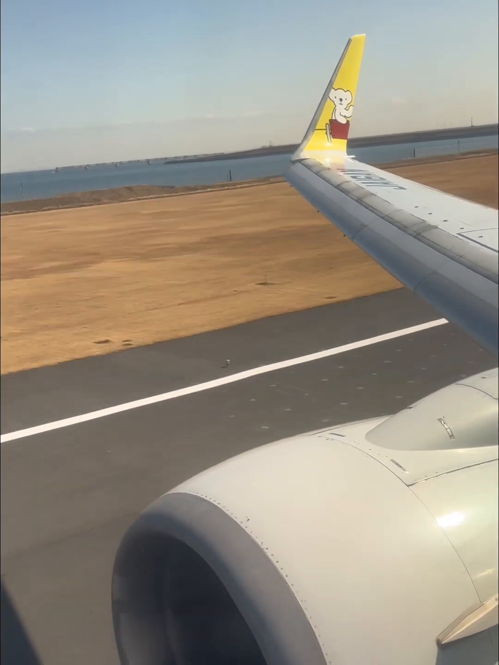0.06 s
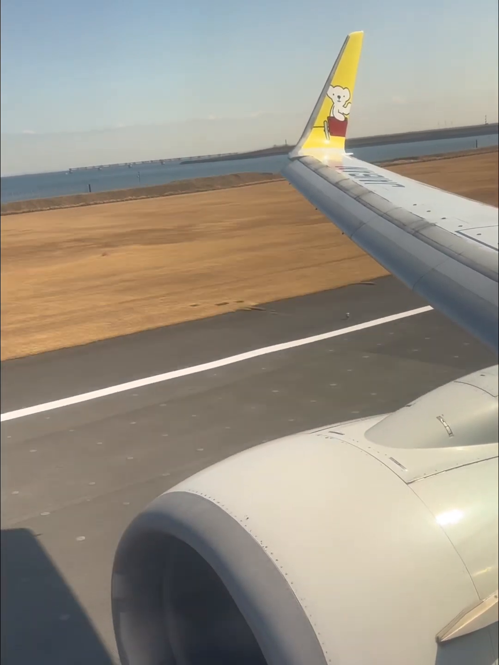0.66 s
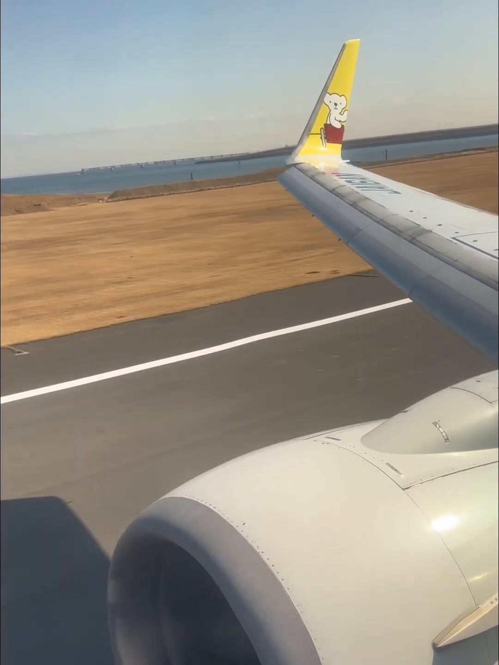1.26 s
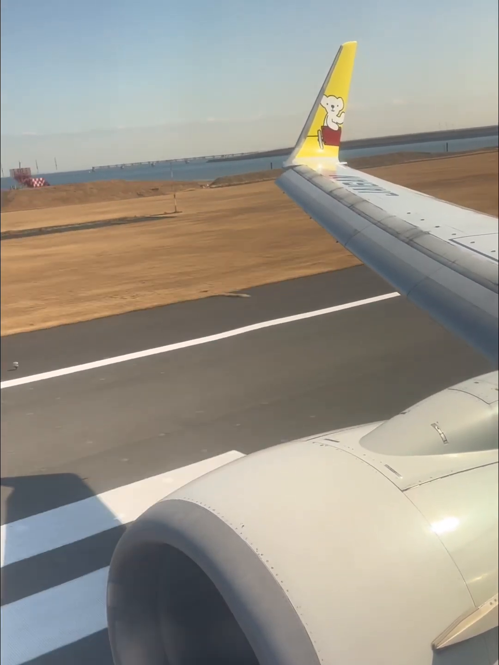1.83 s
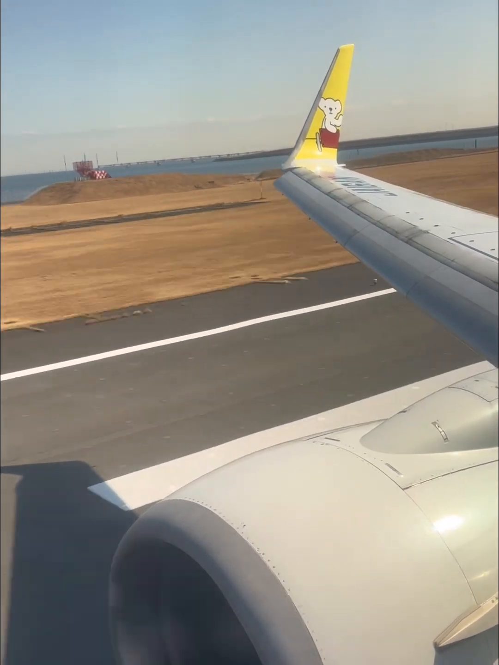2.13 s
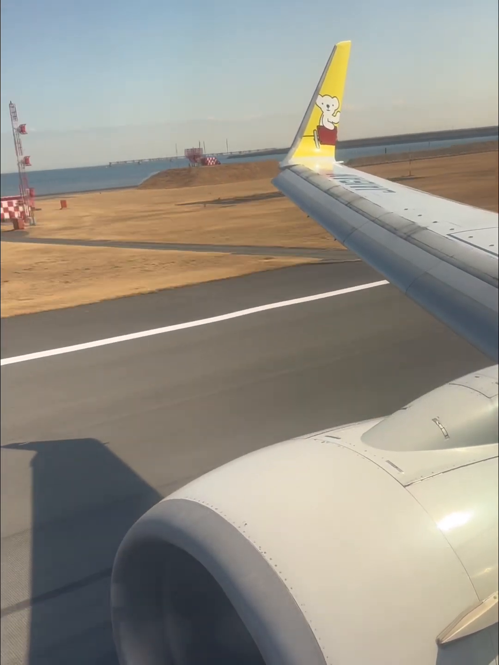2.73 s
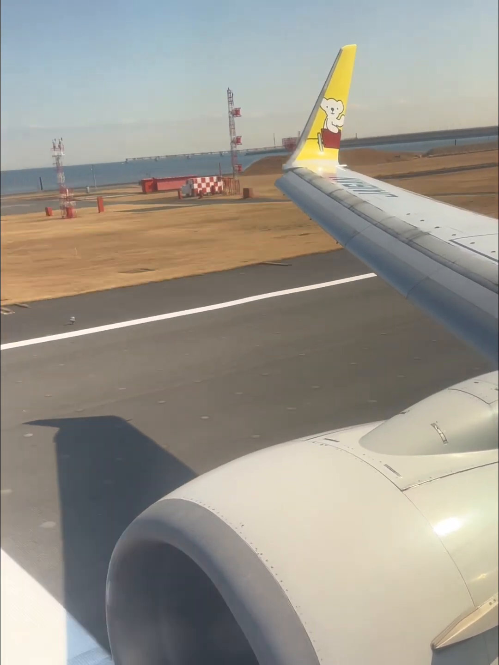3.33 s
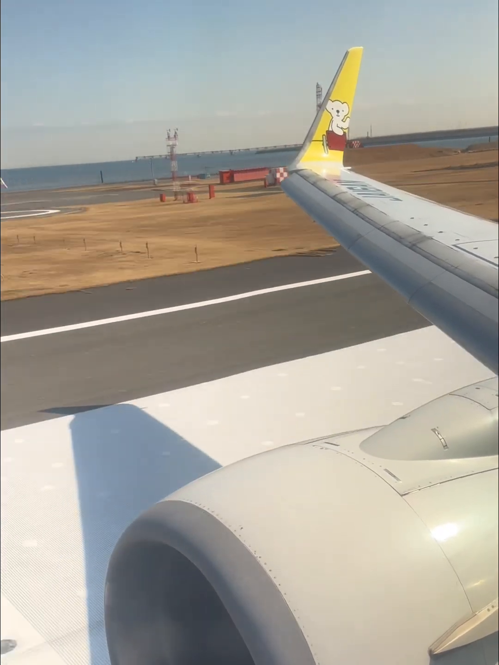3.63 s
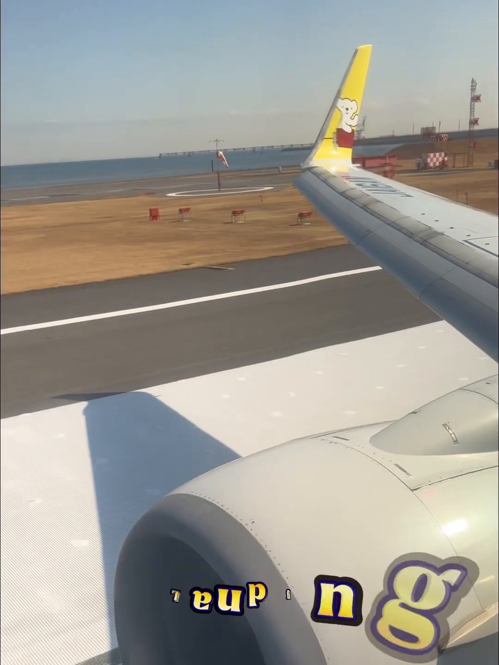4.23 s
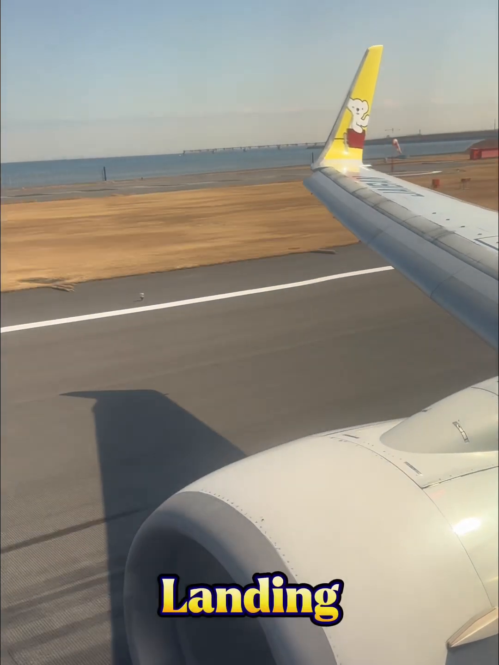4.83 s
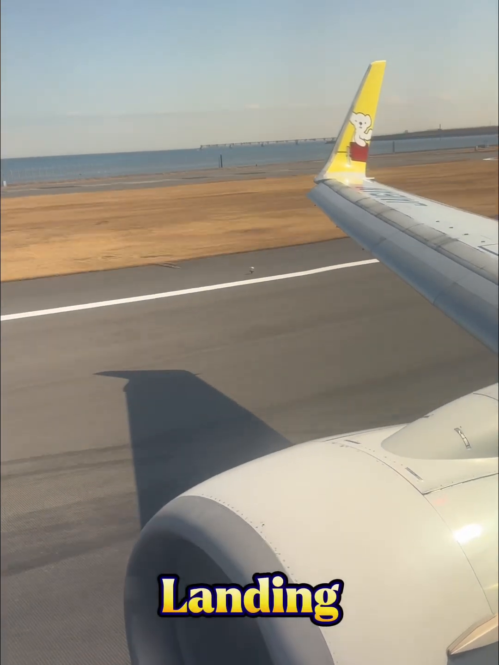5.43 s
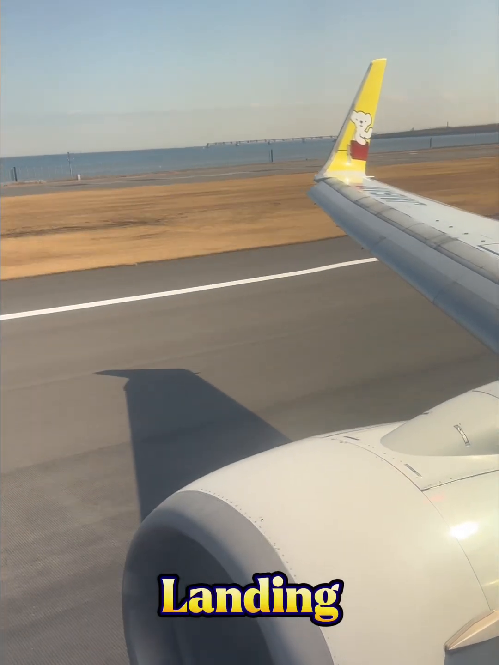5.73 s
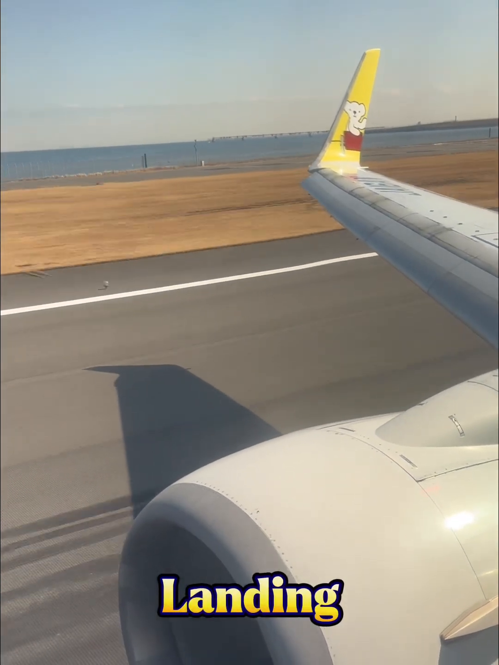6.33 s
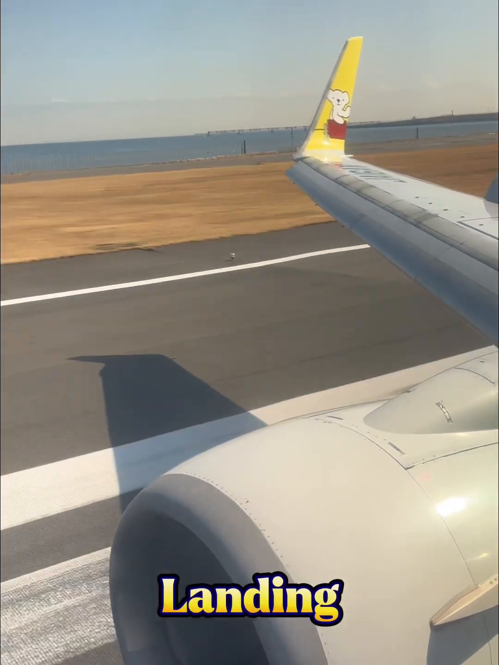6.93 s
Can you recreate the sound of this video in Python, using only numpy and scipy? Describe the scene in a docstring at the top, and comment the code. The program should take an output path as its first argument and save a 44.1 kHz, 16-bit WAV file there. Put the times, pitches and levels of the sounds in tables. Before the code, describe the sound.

Rushing air and engine hum inside an airliner, then wheels thump down, the cabin rattles, and a reverse thrust roar builds.

```python
"""Landing from a window seat

Air rushes along an airliner's hull and hisses from the vents; the engine beside the seat hums while its
fan whine glides down to idle. The wheels thump onto the runway, the tyres rumble, and the cabin trim
rattles and clicks with the jolts. The reversers whirr open and their roar builds as the plane slows."""
import sys
import numpy as np
from scipy import signal
from scipy.fft import rfft, irfft, next_fast_len
from scipy.io import wavfile
from scipy.ndimage import uniform_filter1d, minimum_filter1d, map_coordinates

SR = 44100
rng = np.random.default_rng(int(sys.argv[2]) if len(sys.argv) > 2 else 0)


def materialize(psi):
    """Save the field psi as 16-bit PCM at rate SR to the path in sys.argv[1].

    A 1-D psi becomes a single channel; in a 2-D psi each row is a channel.
    """
    bounded = np.clip(np.atleast_2d(psi).T, -1, 1)
    quanta = np.round(bounded * 32767).astype(np.int16)
    wavfile.write(sys.argv[1], SR, quanta)


N = 316197
THROTTLE_CLOSE_S, TOUCHDOWN_S, REVERSE_S = .46, 3.86, 5.97


def amp(db):
    """Decibels to gain."""
    return 10 ** (np.asarray(db) / 20)


def unit(x):
    """Scale to rms 1."""
    return x / np.sqrt(np.mean(x ** 2) + 1e-20)


def since(s):
    """Seconds since a moment, zero before it."""
    return np.maximum(np.arange(N) / SR - s, 0)


def fader(points):
    """A gain for every sample, riding through (seconds, dB) points."""
    return amp(np.interp(since(0), *np.transpose(points)))


def wobble(rate):
    """A smooth random curve, rate knots a second."""
    knots = rng.standard_normal(int(N * rate / SR) + 4)
    return map_coordinates(knots, [np.arange(N) * rate / SR])


def along(points, hz):
    """Read (Hz, value) points on a log frequency axis."""
    f, values = np.transpose(points)
    return np.interp(np.log(hz + 1), np.log(f + 1), values)


def colour(spectrum):
    """An EQ curve through (Hz, dB) points."""
    return lambda hz: amp(along(spectrum, hz))


def filtered(x, response):
    """Shape x with a response given as a function of frequency."""
    size = next_fast_len(N + SR // 2)
    return irfft(rfft(x, size) * response(np.fft.rfftfreq(size, 1 / SR)), size)[..., :N]


def resonance(f, hz, width):
    """Response of one damped mode."""
    return 1j * f * width / (hz * hz - f * f + 1j * f * width)


def peaks(modes):
    """An EQ curve of resonant peaks, each (centre Hz, width Hz, dB)."""
    return lambda f: sum(amp(db) * np.abs(resonance(f, hz, width)) ** 2 for hz, width, db in modes)


def cabin(pair):
    """Spread two unrelated signals: long waves reach both ears alike, short ones differ."""
    # The stereo image at the seat. Each row: frequency in Hz, left-right likeness (1 is identical),
    # left minus right in dB, left's phase lead in radians.
    image = [(85, 1, 0, 0), (130, .998, 0, .02), (200, .994, 0, .05), (360, .97, -.4, .15),
             (480, .8, -1, .35), (750, .62, 0, .3), (1000, .72, -1.5, .45), (1220, .5, -4.5, .35),
             (1550, .82, -1, .2), (1900, .65, -1, .2), (2150, .88, .3, .3), (2450, .4, -.5, .7),
             (3200, .35, -.7, .7), (3800, .38, -.5, 1.2), (4800, .5, .3, 2.1), (5600, .5, 0, .7),
             (6500, .75, 0, -.1), (8500, .62, 0, -1.2), (11000, .65, 0, -2.6)]
    likeness, tilt_db, lead = (np.array(image)[:, [0, column]] for column in (1, 2, 3))
    turn = lambda hz: np.arccos(np.clip(along(likeness, hz), -1, 1)) / 2
    mid, side = filtered(pair, lambda hz: np.array([np.cos(turn(hz)), np.sin(turn(hz))]))
    lean = lambda hz: amp(along(tilt_db, hz) / 2) * np.exp(1j * along(lead, hz) / 2)
    return filtered(np.array([mid + side, mid - side]), lambda hz: np.array([lean(hz), 1 / lean(hz)]))


def rush(response):
    """Turbulence coloured by a response, filling the cabin at rms 1."""
    return unit(filtered(cabin(rng.standard_normal((2, N))), response))


def ripple(x, depth_db=2.4, spacing_hz=55, lowest_hz=2400):
    """Reflections off wall and seats carve still peaks and dips into the treble."""
    knots = rng.standard_normal(int(SR / 2 / spacing_hz) + 4)
    swing_db = lambda hz: depth_db * map_coordinates(knots, [hz / spacing_hz])
    return filtered(x, lambda hz: amp(swing_db(hz) * (hz > lowest_hz)))


def spool(before, after, start_s, lag_s):
    """A heavy rotor eases from one state to another."""
    lags = since(start_s) / lag_s
    return after + (before - after) * (1 + lags) * np.exp(-lags)


def slipstream(flutter_db=.61):
    """The hull passes the low part of the air rushing by, easing as the plane slows."""
    # The rush through the hull. Each row: frequency in Hz, relative level in dB.
    hull_eq = [(5, -73), (18, -38.5), (32, -11.5), (52, 0), (97, 0.5), (122, -1), (162, -5.5), (195, -4.5),
               (240, -4), (272, -10.5), (305, -7.5), (348, -10), (385, -22.5), (540, -30), (1500, -92.5)]
    # Its fader ride. Each row: time in seconds, level in dB.
    ride = [(0, -12), (.7, -14.5), (1.2, -15.5), (2.1, -14.6), (2.8, -16.5), (3.3, -15), (3.8, -15),
            (5.3, -16), (7.17, -18.5)]
    return fader(ride) * amp(flutter_db * wobble(7)) * rush(colour(hull_eq))


def vents(hiss_db=-40.5, hiss_db_per_s=-.34, duct_db=-45.5, duct_db_per_s=-.2, edge_hz=10500):
    """The air conditioning hisses, rings and whistles in its ducts, slowly easing off."""
    # The broad hiss of air. Each row: frequency in Hz, relative level in dB.
    hiss_eq = [(200, -4), (480, -1), (790, 0.5), (890, -6), (1020, -4), (1160, -10), (1600, -12.5),
               (1720, -15), (1930, -18), (2300, -20), (2700, -17), (4200, -22), (5000, -19.5), (6200, -26),
               (9500, -30)]
    # Resonances of the vents and ducts. Each row: centre in Hz, width in Hz, relative level in dB.
    duct_modes = [(606, 40, 10), (781, 68, 6.5), (1427, 120, -4.5), (1613, 33, -2), (3390, 100, -17),
                  (5000, 70, -12.5), (5610, 210, -17)]
    # The breathy whistle. Each row: centre in Hz, width in Hz, relative level in dB.
    whistle_modes = [(2033, 82, -5), (2136, 57, 0.5), (2276, 300, -9.5)]
    # The whistle's fader ride. Each row: time in seconds, level in dB.
    whistle_ride = [(0, -52), (.5, -51.5), (1, -51.5), (1.5, -55.5), (1.9, -55), (2.6, -52.5), (3.4, -52.5),
                    (5, -53.5), (7.17, -56)]
    t = since(0)
    rolled_off = lambda hz: colour(hiss_eq)(hz) / np.sqrt(1 + (hz / edge_hz) ** 20)
    hiss = amp(hiss_db + hiss_db_per_s * t) * rush(rolled_off)
    ducts = amp(duct_db + duct_db_per_s * t) * rush(peaks(duct_modes))
    whistle = fader(whistle_ride) * rush(peaks(whistle_modes))
    return ripple(hiss) + ducts + whistle


def fan_whine(start_hz=41.3, idle_hz=23.95, buzz_db=-48, buzz_above_hz=38.8, rush_db=-59):
    """Blade tones glide down with the shaft; the supersonic tips' buzz and the fan's rush die away."""
    # Blade tones, loudest as they beam at the seat. Each row: multiple of the shaft speed, level in dB
    # before the wall, shaft speed in Hz that aims the beam at the seat, beam spread in shaft Hz.
    blades = [(116, -68, 39, 2), (122, -64, 41, 1.6), (124, -62, 41, .5), (134, -68, 41, 2),
              (140, -64, 31, 2), (146, -62.5, 38.5, 2), (148, -60, 40.2, .7), (148, -65.5, 34, 4),
              (156, -62, 38.3, .6), (156, -62, 27.9, .4), (156, -59.5, 26.35, .5), (164, -67, 34, 3.5),
              (172, -65.5, 40.6, 1), (172, -59.5, 33.9, 2.8), (172, -61, 28.6, .5), (180, -65, 41.3, .6),
              (196, -59.5, 39.6, 1.6)]
    # Resonances where the wall lets the whine in. Each row: centre in Hz, width in Hz, gain in dB.
    wall_modes = [(4100, 110, -2), (4600, 110, 1), (4830, 120, -1), (5100, 100, -1), (5460, 110, 2),
                  (5690, 90, -6), (6020, 200, -1), (6250, 150, -7), (7080, 250, -2), (7500, 400, -6)]
    shaft_hz = spool(start_hz, idle_hz, THROTTLE_CLOSE_S, lag_s=.92)
    drift, flicker = wobble(110), np.array([wobble(24), wobble(24)])
    shifted = lambda curve: np.roll(curve, rng.integers(N), axis=-1)  # each tone wavers in its own way

    def tone(multiple, jitter_hz=.1, blur_radians=.45, flicker_db=3):
        """One multiple of the shaft speed, blurred by uneven inflow."""
        turns = np.cumsum(shaft_hz + jitter_hz * shifted(drift)) / SR
        phase = 2 * np.pi * multiple * turns + blur_radians * shifted(flicker)
        return amp(flicker_db * shifted(flicker)) * np.sqrt(2) * np.sin(phase)

    supersonic = np.clip((shaft_hz - buzz_above_hz) / (start_hz - buzz_above_hz), 0, 1)
    out = amp(buzz_db) * np.sqrt(supersonic) * tone(multiple=24)
    grid_hz = np.arange(SR // 2)
    wall = peaks(wall_modes)(grid_hz)
    for multiple, db, aim_hz, spread_hz in blades:
        beam = np.exp(-.5 * ((shaft_hz - aim_hz) / spread_hz) ** 2)
        through_wall = np.interp(multiple * shaft_hz, grid_hz, wall)
        out += amp(db) * beam * through_wall * tone(multiple)
    air = rush(lambda f: resonance(f, hz=6500, width=4500) ** 2)
    return out + amp(rush_db) * (shaft_hz / start_hz) ** 6 * air


def core_hum(start_hz=203, idle_hz=177.5, waver_db=2, waver_hz=.96, blur_radians=.35):
    """The core shaft's imbalance hums through the wing, once a turn, blurred by the buffeting."""
    # The hum's fader ride. Each row: time in seconds, level in dB.
    ride = [(0, -28.5), (1.5, -27.5), (1.85, -21), (2.35, -19), (2.7, -31), (3.15, -19), (3.6, -29),
            (4.8, -27.5), (5.5, -20.5), (6.2, -22), (6.7, -27), (6.92, -16), (7.17, -31)]
    shaft_hz = spool(start_hz, idle_hz, THROTTLE_CLOSE_S, lag_s=.88) + waver_hz * wobble(14)
    phase = 2 * np.pi * np.cumsum(shaft_hz) / SR + blur_radians * wobble(36)
    return fader(ride) * amp(waver_db * wobble(16)) * np.sqrt(2) * np.sin(phase)


def rolling(db, db_per_s, settle_s=.052):
    """A gain that opens as the wheels take the weight, then drifts steadily in dB."""
    age = since(TOUCHDOWN_S)
    return np.minimum(age / settle_s, 1) * amp(db + db_per_s * age)


def shaking(attack_s=.05, fall_db_per_s=93.5):
    """The cabin's shake: each jolt rises, holds and dies away; their energies add."""
    # Jolts from the runway. Each row: end of the rise in seconds, strength in dB, hold in seconds.
    jolts = [(3.896, -38, .07), (4.034, -34, 0.3), (4.363, -45, 0.065), (4.472, -45, .075),
             (5.039, -39, .075), (5.254, -44, 0.12), (5.523, -44.5, 0.04), (5.664, -45.5, 0.031),
             (5.904, -47.5, 0.036), (6.12, -51, .04), (6.748, -52.5, 0.089), (6.9, -52.5, 0.25)]
    energy = np.zeros(N)
    for s, db, hold_s in jolts:
        rise = np.minimum(since(s - attack_s) / attack_s, 1)
        energy += (rise * amp(db - fall_db_per_s * since(s + hold_s))) ** 2
    return np.sqrt(energy)


def tyre_rumble(jolt_gain_db=29, bump_db=1.35):
    """Tyres rumble over uneven pavement, harder in each jolt and as the brakes bite."""
    # The rumble's tone. Each row: frequency in Hz, relative level in dB.
    tyre_eq = [(8, -55), (20, -17), (32, -11), (52, 3.5), (72, 1.5), (90, -7), (115, -11), (170, -18.5),
               (260, -28.5), (400, -34), (900, -41.5), (1600, -60), (5000, -110)]
    level = np.hypot(rolling(db=-16.5, db_per_s=1.47), amp(jolt_gain_db) * shaking())
    return level * amp(bump_db * wobble(15)) * rush(colour(tyre_eq))


def rattle(contacts_per_s=900, t60=.014, rub=.68, trim_gain_db=-1.5, panel_gain_db=-7.5,
           clump_db=3.5, panel_lag_s=.038):
    """Shaken trim chatters in many tiny contacts; the heavier panels buzz late and linger."""
    # The chattering trim. Each row: frequency in Hz, relative level in dB.
    trim_eq = [(150, -53), (500, -1.5), (800, 9), (1050, 5.5), (1300, 1.5), (1750, -1.5), (2300, -2.5),
               (3100, -5.5), (4200, -10), (5000, -9.5), (6000, -8), (8000, -11), (10500, -12),
               (12000, -35.5), (16000, -35.5)]
    # Modes of the plastic panels and bins. Each row: centre in Hz, width in Hz, relative level in dB.
    panel_modes = [(2225, 210, 1.5), (2960, 170, -6), (3510, 170, -0.5), (3935, 100, 0), (4230, 200, 0),
                   (4900, 300, -5)]
    shake = np.hypot(shaking(), rolling(db=-54, db_per_s=-.6))  # rolling alone keeps them just astir
    inertia = np.exp(-1 / (panel_lag_s * SR))
    panel_shake = signal.lfilter([1 - inertia], [1, -inertia], shake)
    contacts = (rng.random(N) < contacts_per_s / SR) * rng.random(N)
    decay = amp(-60 * np.arange(SR // 8) / SR / t60)
    energy = np.abs(signal.fftconvolve(contacts ** 2, decay ** 2)[:N])
    chatter = lambda: (unit(np.sqrt(energy)) + rub) * rng.standard_normal((2, N))
    trim = filtered(chatter(), colour(trim_eq))
    panels = np.zeros((2, N))
    for hz, width, db in panel_modes:
        clumps = chatter() * amp(clump_db * wobble(90))
        panels += amp(db) * filtered(clumps, lambda f: resonance(f, hz, width))
    buzz = amp(panel_gain_db) * panel_shake * unit(cabin(panels))
    return amp(trim_gain_db) * shake * unit(cabin(trim)) + buzz


def gear_thumps(judder_radians=.93):
    """Hard blows through the landing gear set the airframe booming for a few uneven cycles."""
    # The blows. Each row: start in seconds, peak level in dB, pitch in Hz, swell time in seconds.
    blows = [(3.872, -1.5, 52.8, .02), (3.955, -9.5, 183.3, 0.053), (3.965, -7.5, 58, .025),
             (4.02, -5.5, 59.7, 0.017), (4.06, -7, 165.3, 0.054), (4.14, -6, 122.6, 0.045),
             (4.195, -6, 72, 0.04), (4.268, -1.5, 74.8, .026), (4.335, -6, 53.1, .032),
             (4.49, -9, 119.6, 0.018), (4.507, -3.5, 65.6, 0.014), (4.776, -7, 107.8, .014),
             (4.87, -9, 56.6, 0.021), (5.015, -8.5, 139.6, .035), (5.1, -11.5, 54.8, 0.028),
             (5.29, -9, 100, 0.024), (5.405, -13.5, 221, 0.028), (5.869, -2, 54.8, 0.018),
             (6.355, -7.5, 60.1, .044), (6.37, -9, 104.5, 0.014), (6.52, -7.5, 49.5, 0.045),
             (6.89, -11, 56.4, .04), (7.091, -9.5, 62.7, .02)]
    out = np.zeros(N)
    for s, db, hz, swell_s in blows:
        age = since(s)
        envelope = (age / swell_s * np.exp(1 - age / swell_s)) ** 2
        phase = 2 * np.pi * hz * age + judder_radians * wobble(hz / 2)
        out -= amp(db) * envelope * np.sin(phase)
    return out


def clicks(ring_q=4, crack_q=1.2, crack_db=-5, crack_t60=.0051, room_db=-24, room_t60=.16,
           edge_hz=12000):
    """Loose plastic fittings snap home: a broad crack, a short ring, a brief answer from the cabin."""
    # The fittings' knocks. Each row: start in seconds, strength in dB, centre in Hz,
    # seconds for the ring to fall 60 dB.
    knocks = [(3.913, -27, 5970, .0063), (3.933, -20, 8500, 0.0071), (3.948, -20.5, 7280, 0.0065),
              (3.953, -31, 8000, .03), (3.974, -21, 5800, .01), (3.973, -14.5, 1200, .035),
              (4.034, -24, 8000, .025), (4.058, -17.5, 1000, 0.04), (4.095, -28, 3800, .03),
              (4.097, -16, 1100, .04), (4.148, -14.5, 950, 0.047), (4.17, -16.5, 1200, 0.046),
              (4.198, -24.5, 4100, .03), (4.217, -24, 4200, .05), (4.278, -18.5, 850, .05),
              (4.324, -15, 960, 0.044), (4.326, -21.5, 2230, .04), (4.344, -21.5, 7420, .012),
              (4.398, -18.5, 900, .05), (4.645, -19.5, 1096, 0.052), (4.811, -28, 2020, .022),
              (4.831, -22.5, 1200, .06), (4.848, -19.5, 1140, 0.076), (5.144, -28.5, 7000, 0.034),
              (5.151, -16.5, 7260, .026), (5.151, -24.5, 2800, .027), (5.154, -14.5, 995, .085),
              (5.241, -27, 7000, 0.019), (5.327, -32.5, 3800, .05), (5.369, -25, 6160, 0.01),
              (5.37, -26, 2200, .02), (5.573, -28.5, 7240, .009), (5.658, -27, 6500, .016),
              (5.672, -24, 2160, 0.054), (6.64, -39, 7100, .03), (6.995, -37.5, 6500, .025)]
    out, size = np.zeros((2, N)), SR // 5
    age, f = np.arange(size) / SR, np.fft.rfftfreq(size, 1 / SR)
    burst = lambda envelope: rfft(envelope * rng.standard_normal((2, size)))
    room_tail = amp(room_db - 60 * age / room_t60)
    for s, db, hz, t60 in knocks:
        ring = burst(amp(-60 * age / t60) + room_tail) * resonance(f, hz, hz / ring_q)
        crack = burst(amp(crack_db - 60 * age / crack_t60)) * resonance(f, hz, hz / crack_q)
        start = round(s * SR)
        out[:, start:start + size] += amp(db) * irfft(ring + crack, size)[:, :N - start]
    return cabin(filtered(out, lambda hz: 1 / np.sqrt(1 + (hz / edge_hz) ** 10)))


def reverse_thrust(spill_db=-40.8, spill_db_per_s=4.5):
    """Fan air spills from the opening reversers, then drums on the hull as the engines spool up."""
    # The roar on the hull. Each row: frequency in Hz, relative level in dB.
    roar_eq = [(30, -71), (120, -28.5), (165, -16), (200, -0.5), (235, 4), (280, -7), (320, -3.5),
               (358, -11), (385, -22.5), (440, -36), (900, -74.5)]
    # The roar's fader ride. Each row: time in seconds, level in dB.
    roar_ride = [(5.8, -70.5), (6.05, -22), (6.3, -18), (6.6, -14.5), (6.83, -12.5), (7.17, -16.5)]
    # The spilling air. Each row: frequency in Hz, relative level in dB.
    spill_eq = [(200, -21.5), (420, 3.5), (600, 2.5), (850, -6.5), (1150, -16), (1550, -9), (1900, -26.5),
                (2400, -26), (3300, -24), (6000, -36.5), (13000, -60)]
    roar = fader(roar_ride) * rush(colour(roar_eq))
    opening = spool(0, 1, REVERSE_S, lag_s=.12)
    spill = opening * amp(spill_db + spill_db_per_s * since(REVERSE_S)) * rush(colour(spill_eq))
    return roar + spill


def reverser_whirr(centre_s=6.07, half_length_s=.089, db=-34, hz=412, rise_hz_per_s=140):
    """A short, rising whirr as the reversers slide open."""
    t = since(0) - centre_s
    envelope = np.exp(-(t / half_length_s) ** 4)
    return amp(db) * envelope * np.sin(2 * np.pi * (hz + rise_hz_per_s * t / 2) * t)


def scene():
    """The mix at the seat: a bed of air and engine, then the runway, then reverse thrust."""
    bed = slipstream() + vents() + fan_whine() + core_hum()
    runway = tyre_rumble() + rattle() + gear_thumps() + clicks()
    return bed + runway + reverse_thrust() + reverser_whirr()


def record(dry, ceiling=.93, hold_s=.018, top_hz=15800):
    """A limiter ducks the loudest jolts, and a steep low-pass cuts the very top."""
    hold = int(hold_s * SR)
    needed = np.minimum(1, ceiling / (np.abs(dry).max(axis=0) + 1e-9))
    gain = uniform_filter1d(minimum_filter1d(needed, hold), hold)
    return filtered(dry * gain, lambda hz: hz < top_hz)


dry = scene()
out = record(dry)
materialize(out)
```